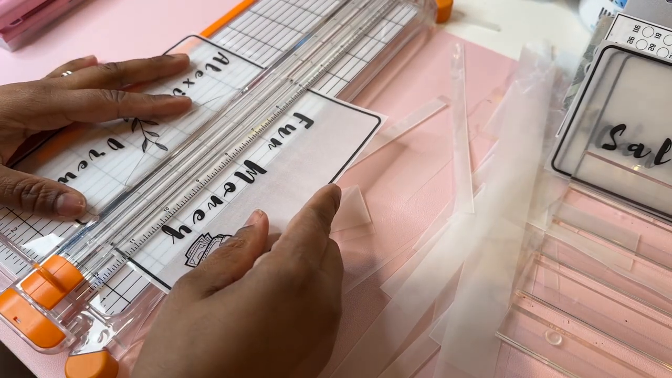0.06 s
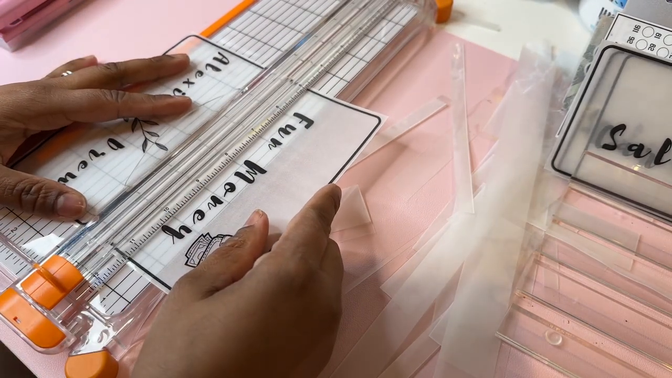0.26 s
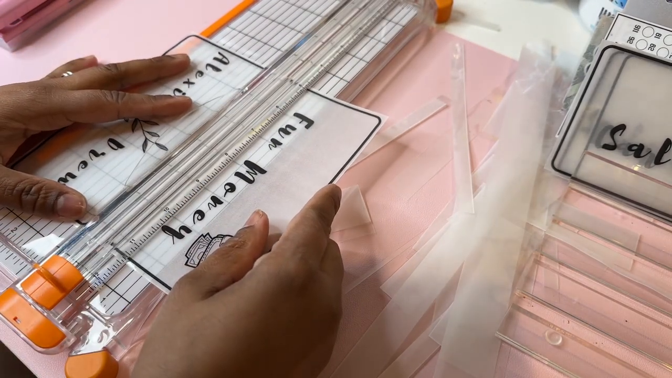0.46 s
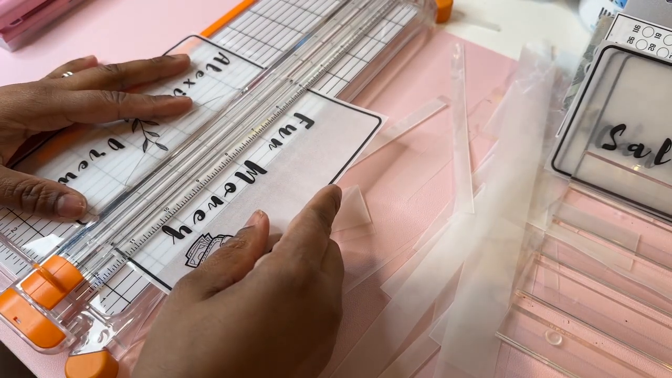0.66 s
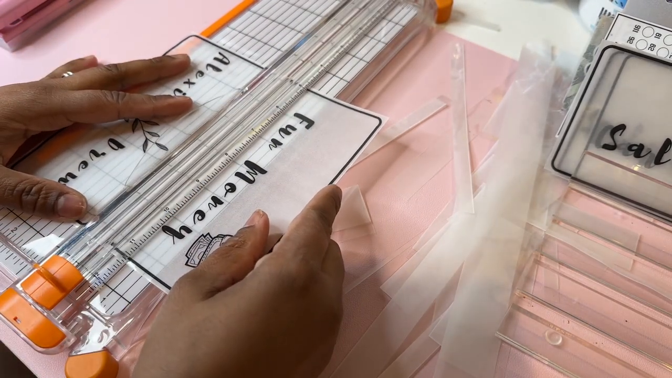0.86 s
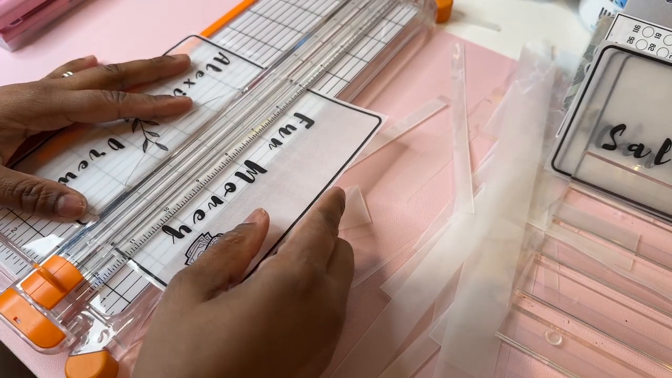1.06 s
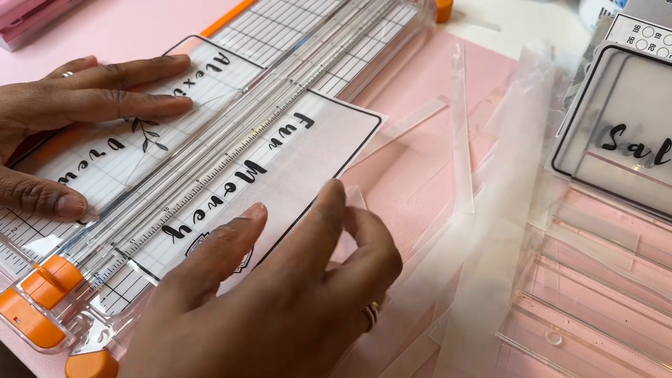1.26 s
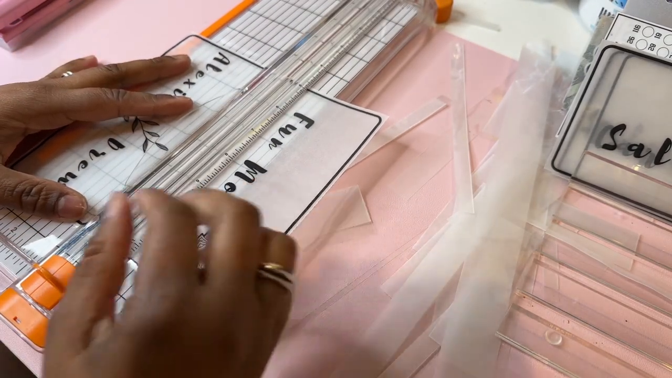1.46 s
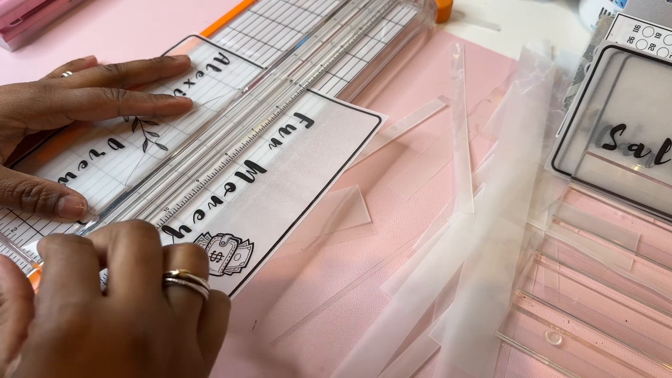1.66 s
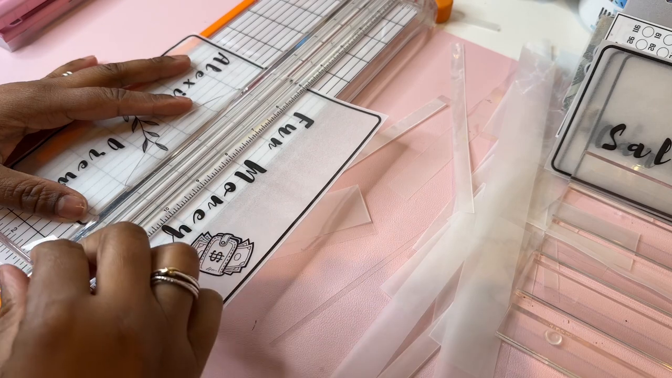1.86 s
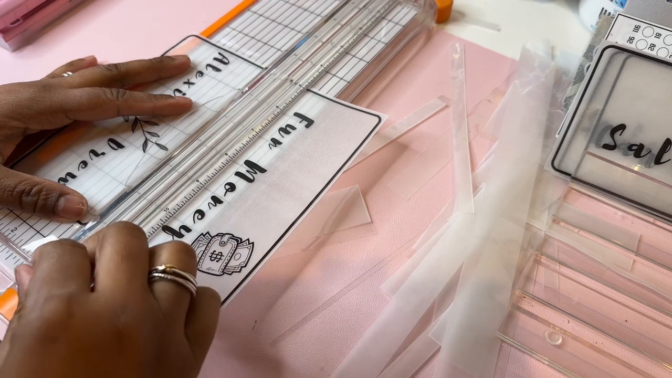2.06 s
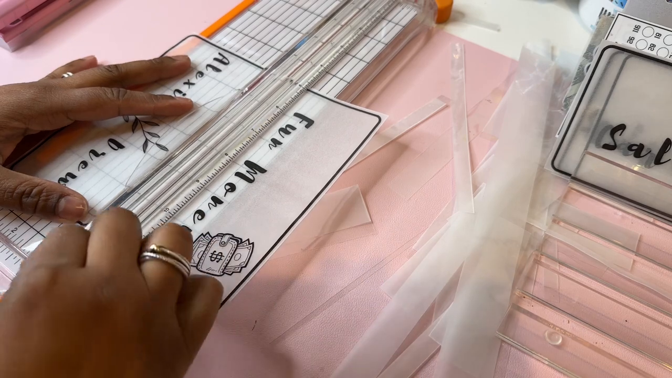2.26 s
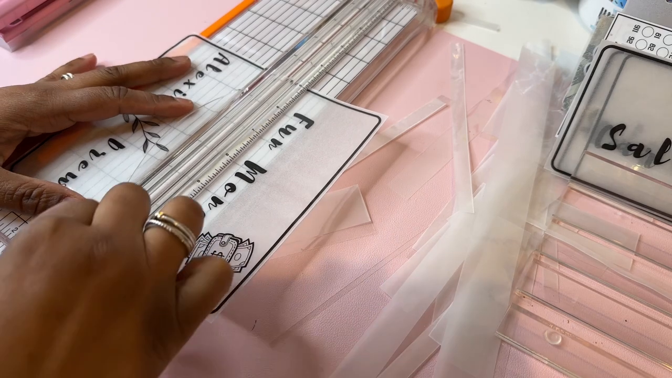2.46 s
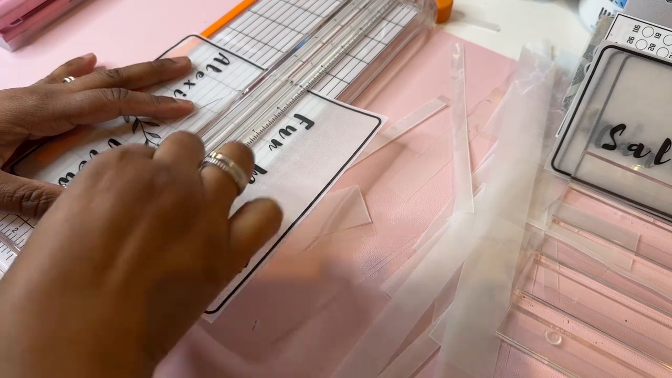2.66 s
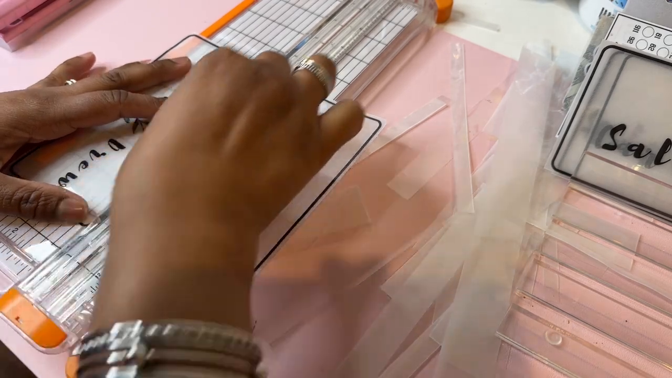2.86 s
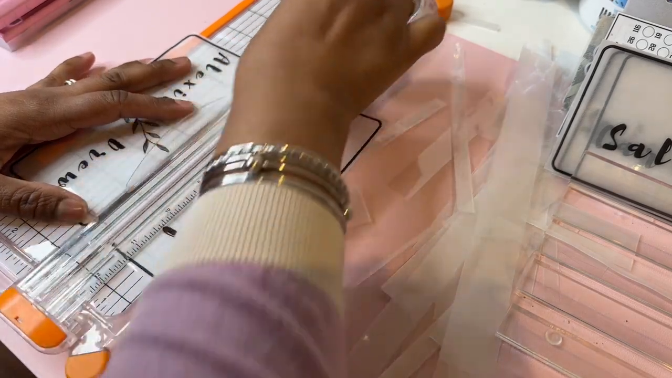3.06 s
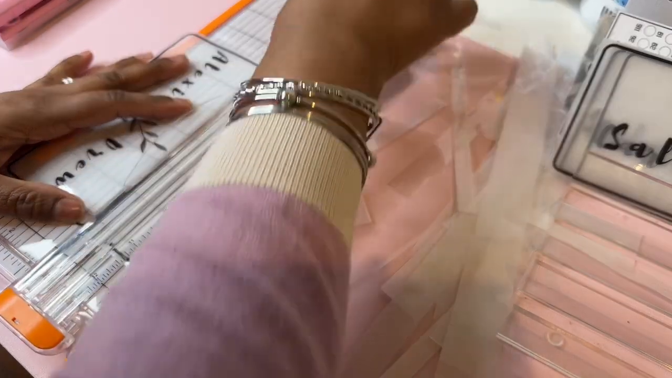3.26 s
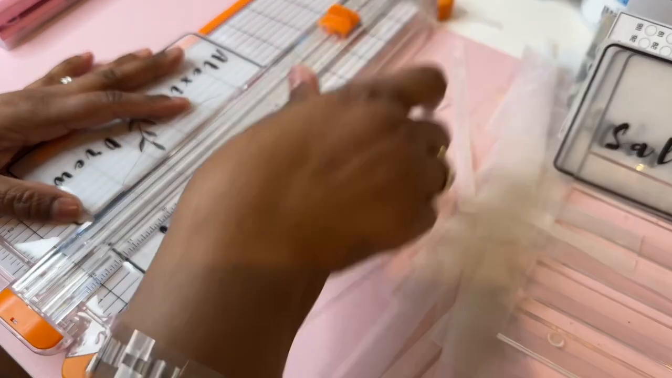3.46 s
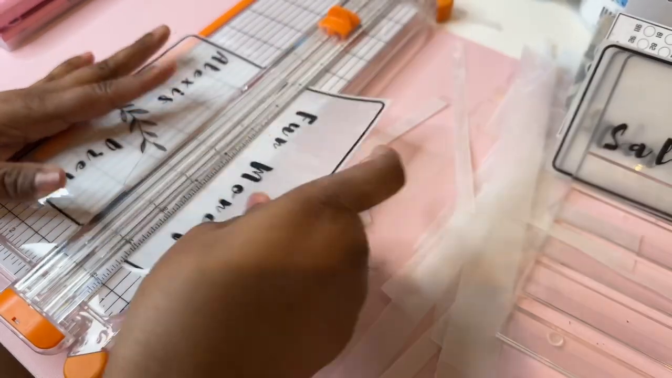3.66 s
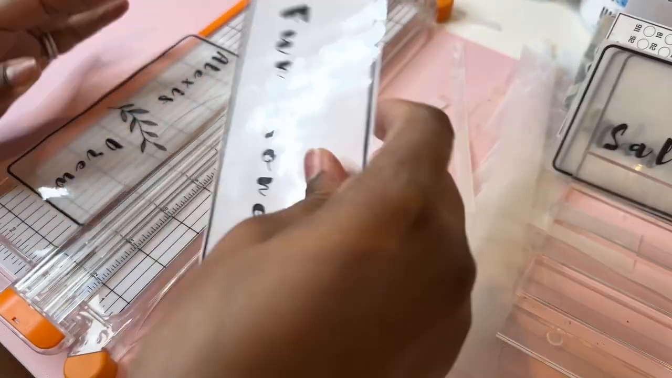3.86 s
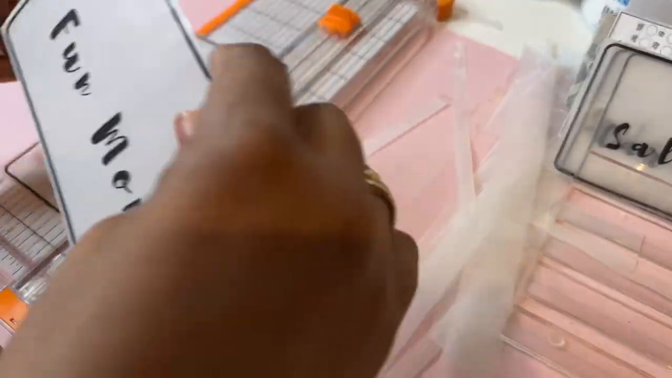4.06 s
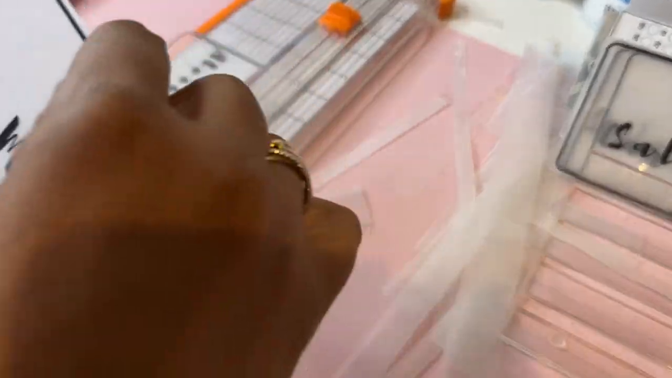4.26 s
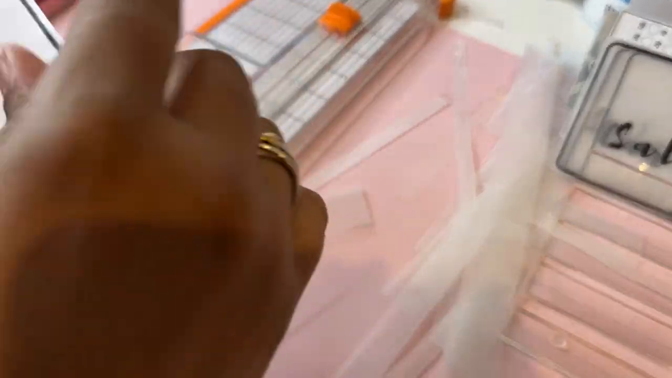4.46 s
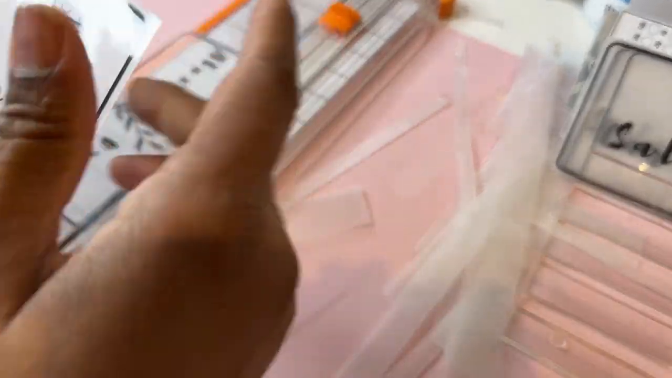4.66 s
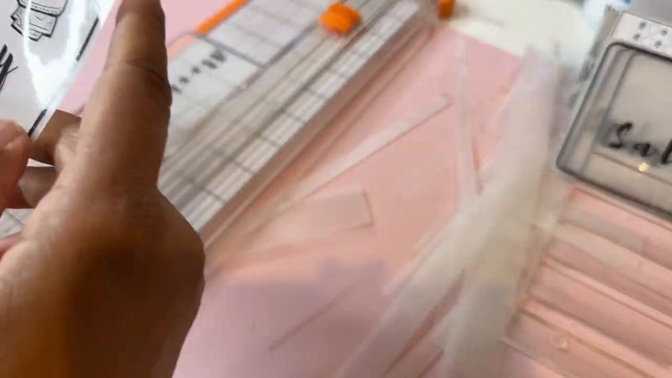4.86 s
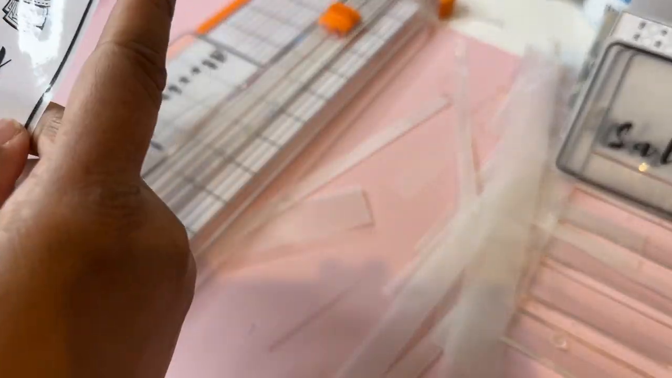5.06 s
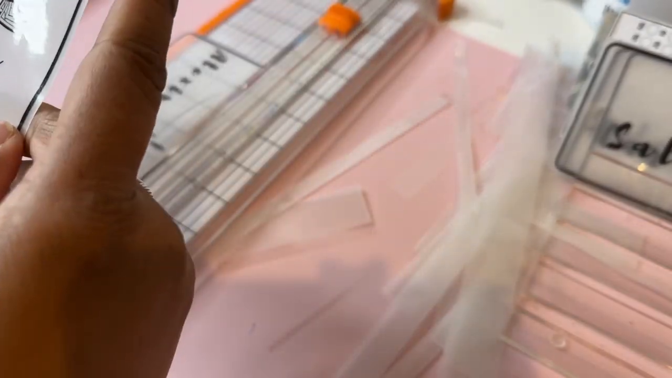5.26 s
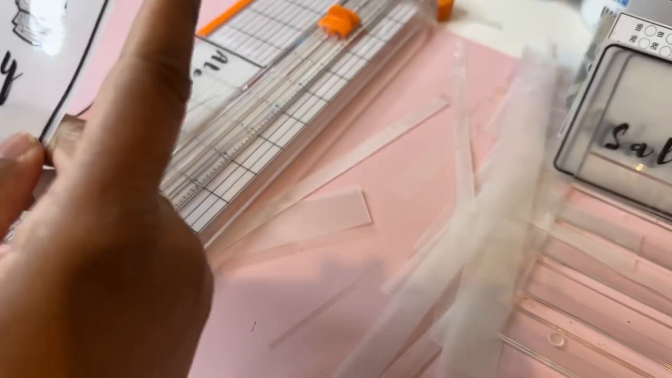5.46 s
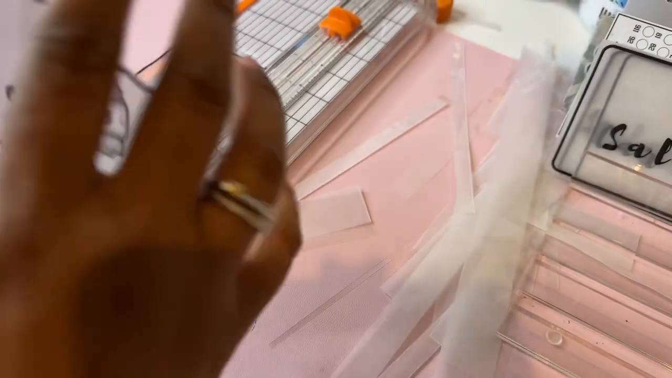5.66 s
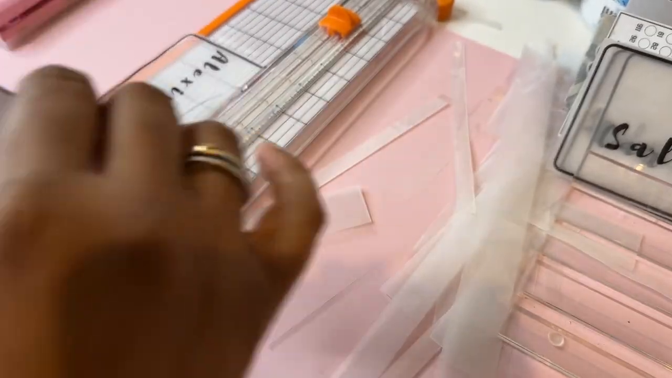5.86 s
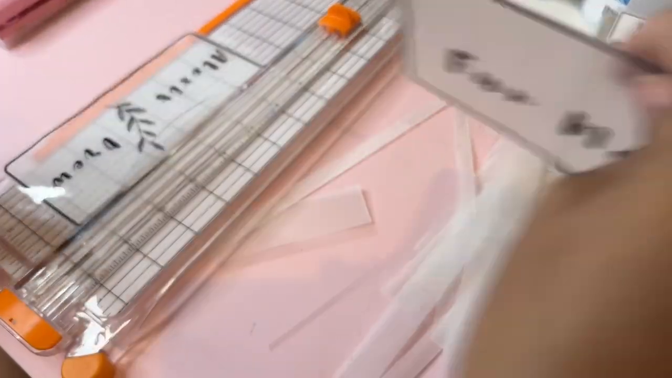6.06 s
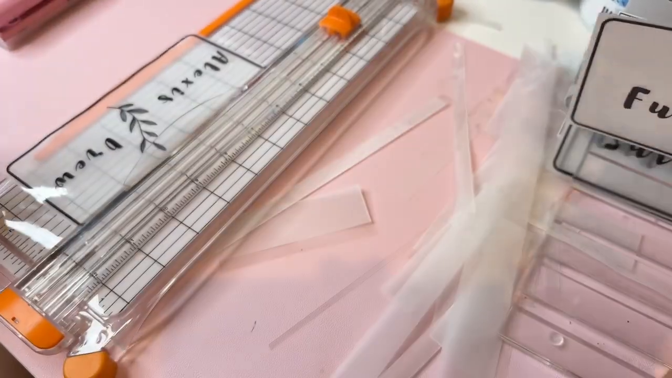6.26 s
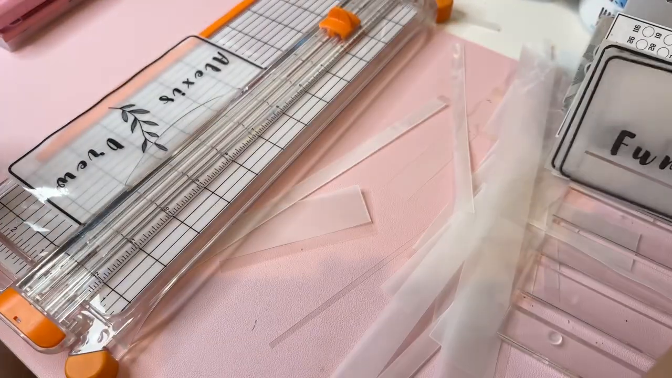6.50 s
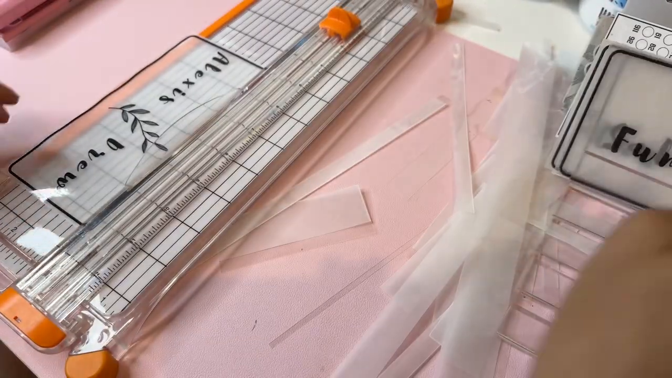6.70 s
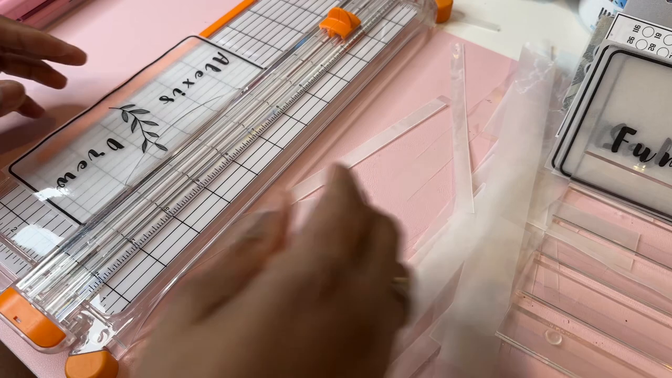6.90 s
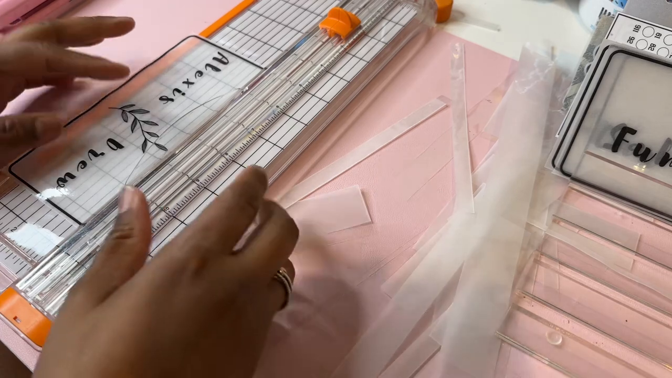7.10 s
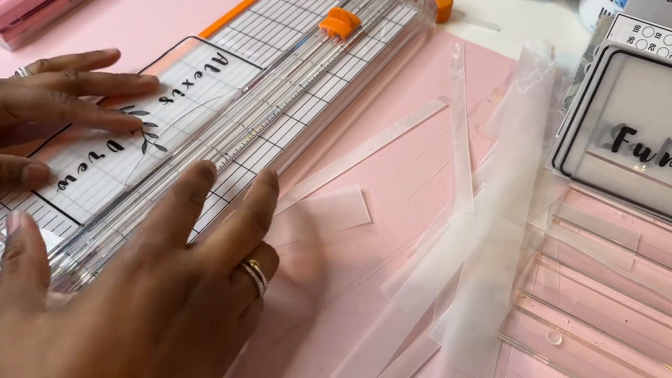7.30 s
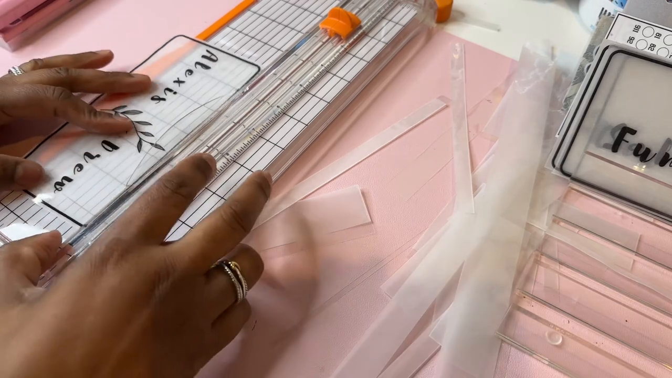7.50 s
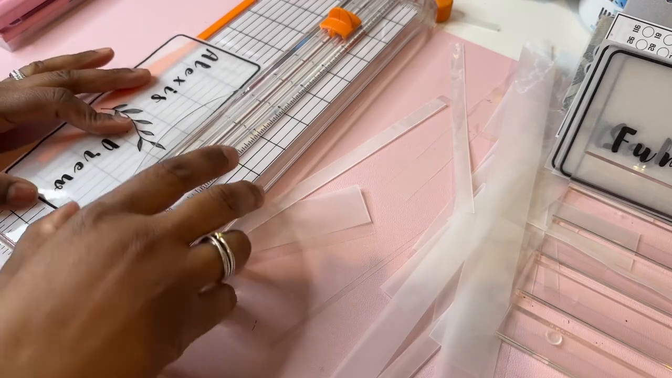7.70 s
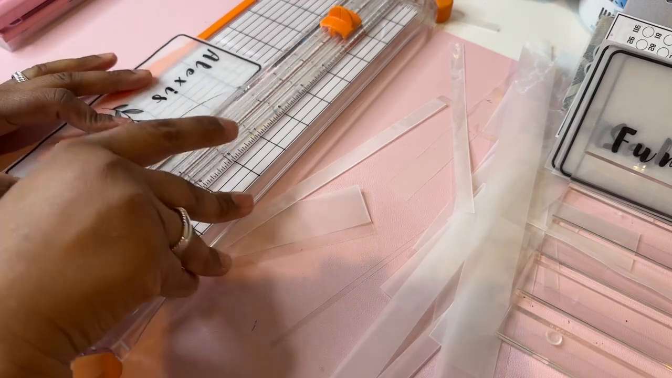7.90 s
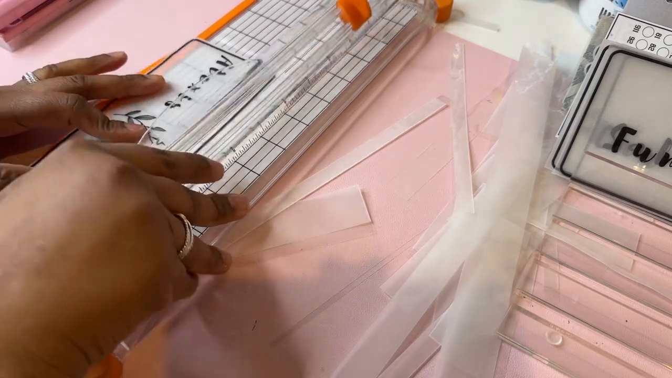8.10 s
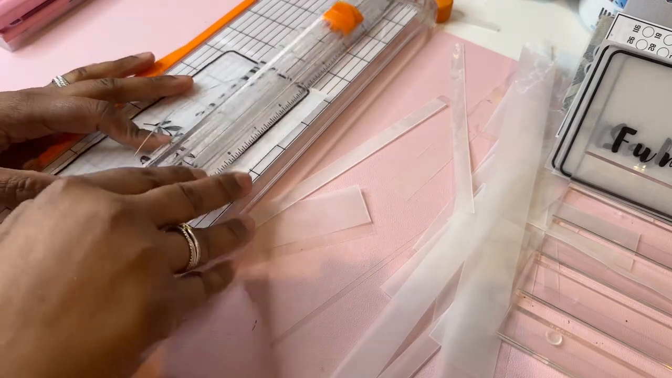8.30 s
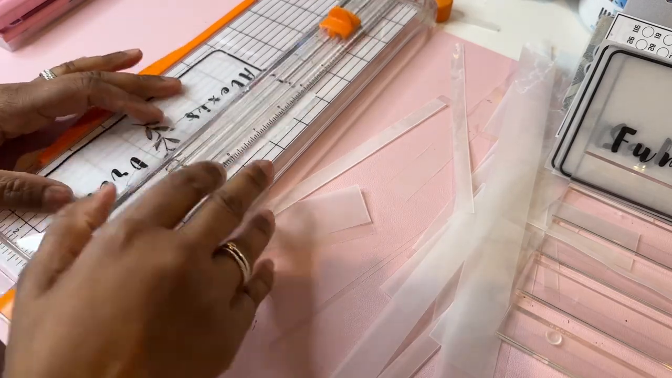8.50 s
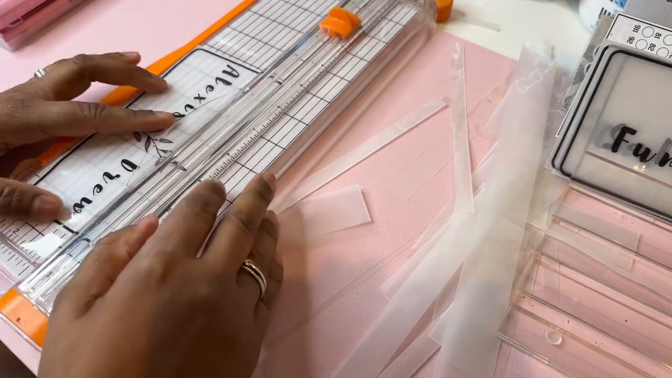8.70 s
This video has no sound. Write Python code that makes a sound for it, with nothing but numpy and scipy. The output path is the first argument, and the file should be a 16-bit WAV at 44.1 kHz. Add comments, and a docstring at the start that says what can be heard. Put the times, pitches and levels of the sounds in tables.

```python
"""Sheet trimmer on a desk

A blade tears through a stiff laminated sheet; the carriage hits its stop and bangles clink. The cut piece
is handled and dropped on a pile, the next sheet slides in and the rail snaps shut, over a low room hum.
Friction: random slips shaking dense modes. Blows: pulse, short dense ring and room tail in three bands.
Bangles: quavering high modes. Hum: wavering sines over coloured air noise."""
import sys
import numpy as np
from scipy import signal
from scipy.fft import rfft, irfft, next_fast_len
from scipy.io import wavfile

SR = 44100
rng = np.random.default_rng(int(sys.argv[2]) if len(sys.argv) > 2 else 0)


def dump(signal):
    """Clip the signal to [-1, 1] and save it as 16-bit WAV at the path in sys.argv[1]."""
    limited = np.clip(np.atleast_2d(signal).T, -1, 1)
    pcm = np.round(limited * 32767).astype(np.int16)
    wavfile.write(sys.argv[1], SR, pcm)


N = 385467

# stroke effort before zone gains [t/s, level/dB]
EFFORT = [(2.615, -57.5), (2.645, -52), (2.899, -49), (2.911, -47.5), (3.03, -46.5)]
# desk rumble, base groan, low and high carriage rattle, blade rasp:
# [low f/Hz, high f/Hz, gain/dB, extra at PRE_STROKE/dB, extra at NEAR_STOP/dB]
CUT_ZONES = [(77, 93, -11.5, -5, -1), (280, 400, -6, 9, 0.5), (605.4, 957, -1, 5, 7),
             (1120, 1750, -4.5, 1, 8), (1790, 22000, 3, -1.5, -2)]
# zone-balance swells [middle t/s, half length/s]; the first is over before the effort starts
PRE_STROKE = (2, 0.082)
NEAR_STOP = (2.995, 0.06)
# colour of the stroke [f/Hz, level/dB]
STROKE_COLOUR = [(120, -2), (220, -8), (370, -1.5), (470, 4.5), (640, -5.5), (1300, -6), (1800, -13.5),
                 (6000, -13), (10000, -22.5), (14500, -23)]
# resonances of the trimmer's base and rail, also used by knocks() [f/Hz, width/Hz, relative level/dB]
TRIMMER_MODES = [(317, 93, 2.5), (395, 9.1, 9.5), (623, 120, 7.5), (1040, 26, 0), (1340, 23, -1.5),
                 (2110, 46, 4.5), (3745, 62, 1.5), (4870, 36, 2), (8370, 96, 3)]


def cut(judder_db=-0.4, left_db=1.5):
    """Thousands of blade slips per second shake the trimmer: groan at first, more rattle near the stop."""
    slips = friction(slips_per_s=5500, size_db=2.0, smooth=1.1, ring_t60_s=0.04, shifts_per_s=40, count=8)
    shaken = resonate(coloured(slips, STROKE_COLOUR), TRIMMER_MODES, ring_db=-10.0)
    effort, = gains_in_time(EFFORT, fade_s=0.02)
    pre_stroke, near_stop = swell(*PRE_STROKE), swell(*NEAR_STOP)
    judder = from_db(judder_db * drift(170))
    zones = 0
    for low_hz, high_hz, db, pre_db, stop_db in CUT_ZONES:
        gain = from_db(db + pre_db * pre_stroke + stop_db * near_stop)
        zone = gain * rms_one(band(shaken, low_hz, high_hz))
        zones = zone - zones   # alternating signs join the zones smoothly
    return (zones * effort + groan()) * judder * panned(left_db)


# base resonance as the cut begins [t/s, f/Hz, level/dB]
GROAN = [(2.616, 660, -45), (2.655, 561.6, -45.5), (2.72, 395, -47.5), (2.79, 384, -56)]
GROAN_CHANGES_PER_S = 520   # widens the resonance


def groan():
    """Slips shake a broad base resonance that sinks as the carriage leaves the stiff end of the rail."""
    s, hz, db = np.transpose(GROAN)
    phase_rad = 2 * np.pi * np.cumsum(np.interp(np.arange(N) / SR, s, hz)) / SR
    level, = gains_in_time(np.transpose([s, db]), fade_s=0.014)
    return level * rms_one(spread(quavering(phase_rad, GROAN_CHANGES_PER_S)))


TRIMMER_LEFT_DB = 3.5   # left-right difference before band shares
# knocks on the trimmer [t/s, strength/dB, snap over clack/dB, thud over clack/dB]
KNOCKS = [(2.3645, -52, 9, 2.5), (2.610, -52, 2, 0), (3.045, -28.5, 3.5, -6.5), (3.2555, -69, 14, 9.5),
          (3.728, -45, 14, -2.5), (7.215, -60.5, 14.5, -10), (7.232, -62.5, 7, 6.5),
          (7.4856, -60.5, 7.5, 7.5), (7.996, -58, -9, 7.5), (8.1235, -68, 16, 6.5), (8.3391, -43, 2, 4.5),
          (8.3493, -43.5, 3.5, -1), (8.3715, -37.5, 10.5, -9), (8.4405, -29.5, 8, -10.5),
          (8.4522, -46, 28, 4), (8.4807, -40, 14, 1.5)]
# quick touches seating the carriage:
# [start t/s, gap/s, strength/dB, hardness/dB, weight/dB, strength step/dB, hardness step/dB]
CARRIAGE_SEATS = (2.2925, .0237, -56.5, -13, -6.5, 1, 3.5)
# snap, clack, thud: [low f/Hz, high f/Hz, gain/dB, first pulse/dB, ring t60/s, room/dB, room t60/s]
TRIMMER_PARTS = [(2188, 14000, 15, -11, 0.072, -11.5, 0.29), (477, 2260, 25.5, -3, 0.098, -10.5, 0.4),
                 (116, 442, 25, -12.5, 0.089, -4, 0.46)]
# colour of the knocks [f/Hz, level/dB]
TRIMMER_COLOUR = [(100, 0), (300, -5), (900, 4), (1600, -1), (2600, -2.5), (4500, 4.5), (7500, -1.5),
                  (11000, -9)]


def knocks():
    """Fingers, carriage and rail strike the trimmer and excite its modes."""
    rows = KNOCKS + touches(CARRIAGE_SEATS, count=3)
    hits = contacts(rows, lambda s: TRIMMER_LEFT_DB, sharp_db=1.0)
    struck = blows(hits, TRIMMER_PARTS, contact_s=0.001052, rise_s=0.00037)
    return resonate(coloured(struck, TRIMMER_COLOUR), TRIMMER_MODES, ring_db=-7.5)


# carriage on its stop, rail snapping shut [t/s, level before modes/dB]
SLAMS = [(3.0459, -21.5), (8.4417, -25.5)]
# damped bending modes of the base [f/Hz, relative level/dB, t60/s]
BASE_MODES = [(332, -3.5, 0.047), (666, -6, 0.027), (915, 3.5, 0.021), (1360, -3.5, .024)]


def slams(room_db=-11, low_hz=240):
    """The base bends under a hard blow and settles fast; its ring carries no deep bass."""
    out = np.zeros((2, N))
    t = np.arange(SR // 2) / SR
    bend = sum(from_db(db) * np.sin(2 * np.pi * hz * t) * decay(t, t60) for hz, db, t60 in BASE_MODES)
    for s, db in SLAMS:
        add(out, s, from_db(db) * band(bend, low_hz, SR / 2)[None])
    tail = convolve(out, dying_noise(0.3, rise_s=0.011))
    return out * panned(TRIMMER_LEFT_DB / 2) + from_db(room_db) * spread(tail)


# soft, hollow thumps of base or sheet [t/s, strength/dB, low f/Hz, high f/Hz]
THUMPS = [(0.982, -63, 300, 715), (2.195, -50.5, 504, 1110), (2.319, -46.5, 282, 1520),
          (2.366, -43, 570, 1420), (3.076, -58, 500, 1320), (3.137, -47.5, 746, 1750),
          (3.156, -50, 446, 1290), (3.167, -45, 298, 1470), (3.226, -45.5, 510, 1110),
          (3.637, -48, 900, 2200), (3.725, -32.5, 660, 1155), (3.734, -34.5, 796, 1610),
          (4.445, -59, 767, 1070), (4.883, -53.5, 150.4, 425), (5.789, -58, 1040, 1480),
          (5.804, -69, 260, 650), (5.905, -56, 1230, 1660), (5.946, -58.5, 1320, 1860),
          (6.114, -49.5, 258, 364), (6.118, -61, 1350, 1680), (6.417, -36, 159, 565),
          (6.448, -41.5, 391, 533), (7.363, -50, 400, 1210), (7.372, -45.5, 250, 956),
          (7.716, -50, 520, 1150), (7.744, -52.5, 457, 1100), (7.758, -46.5, 214, 885),
          (7.9853, -44.5, 323, 1385), (7.997, -41, 171, 396), (8.124, -54.5, 840, 1380)]


def thumps(gain_db=21, front_s=0.0083, front_db=-2, ring_t60_s=0.099, room_db=-5, room_t60_s=0.23, left_db=1):
    """Soft touch, one band of dense modes: falling bending-wave front, then dull ring and room."""
    fronts, rings = np.zeros((2, 2, N))
    t = np.arange(SR // 2) / SR
    for s, db, low_hz, high_hz in THUMPS:
        hz = low_hz + (high_hz - low_hz) * np.exp(-2 * t / front_s)
        envelope = np.sin(np.pi * np.minimum(t / front_s, 1)) ** .5
        front = envelope * np.sin(2 * np.pi * np.cumsum(hz) / SR)
        room = from_db(room_db) * dying_noise(room_t60_s, rise_s=0.013)
        modes = dying_noise(ring_t60_s, rise_s=0.0039) + room
        band_sos = signal.butter(3, [low_hz, high_hz], "band", fs=SR, output="sos")
        ring = signal.sosfilt(band_sos, modes)
        add(fronts, s, from_db(db + front_db) * front[None] / np.linalg.norm(front))
        add(rings, s, from_db(db) * ring / np.linalg.norm(ring, axis=1, keepdims=True))
    energy_norm = np.hypot(1, from_db(front_db))
    return from_db(gain_db) * (fronts + spread(rings)) / energy_norm * panned(left_db)


# sheet flicks, buckles, clatters onto the pile [t/s, strength/dB, snap over clack/dB, thud over clack/dB]
FLICKS = [(3.528, -56, -1, -4), (3.611, -58.5, 6, 4), (3.6325, -51, -24, -15), (3.655, -45, 4.5, -12),
          (3.861, -58.5, -5.5, -7), (4.388, -56, 3.5, 7.5), (4.437, -65, -2, 1), (4.826, -66, 1.5, 3.5),
          (4.876, -73.5, -11, 8.5), (5.787, -60.5, 2, 8.5), (5.814, -62, -3, 4), (5.823, -69.5, 10, 1),
          (5.902, -61, 6, 1.5), (5.943, -67.5, 4.5, 8), (6.115, -64.5, 0, 4), (6.393, -49, 6, 6),
          (6.406, -44, 3, 3), (6.417, -50, 5, -5), (6.432, -51.5, 5, -5), (6.460, -58, 8.5, 3),
          (6.498, -60, 3, 9.5)]
# sheet position, lifted on the left and dropped on the right [t/s, left-right level/dB]
SHEET_PLACE = [(3.6, 3), (4.4, 11.5), (5.9, 6.5), (6.4, -1)]
# snap, clack, thud: [low f/Hz, high f/Hz, gain/dB, first pulse/dB, ring t60/s, room/dB, room t60/s]
SHEET_PARTS = [(2190, 7200, 23, 17, 0.0085, -5, 0.22), (540, 3620, 23.6, -15, 0.035, -5.5, 0.19),
               (101, 440, 20.4, -6, 0.11, -9.5, 0.27)]
# colour of the flicks [f/Hz, level/dB]
SHEET_COLOUR = [(100, 17), (300, 1.5), (1000, 8.5), (2500, -5.5), (4200, 0), (7500, -4.5), (10000, 0.5),
                (15000, 11)]
# resonances of the stiff sheet [f/Hz, width/Hz, relative level/dB]
SHEET_MODES = [(274.9, 80, 1), (452, 400, -15), (970, 77, -14), (1620, 29, -3), (2370, 400, -7),
               (4200, 81, -13)]


def flicks(level_db=-5, ring_db=3):
    """The sheet snaps, taps and clatters; bending waves smear each contact over 4 ms, treble first."""
    hits = contacts(FLICKS, lambda s: np.interp(s, *np.transpose(SHEET_PLACE)), sharp_db=1.0)
    taps = coloured(blows(hits, SHEET_PARTS, contact_s=0.0024, rise_s=0.00085), SHEET_COLOUR)
    t = np.arange(SR // 250) / SR
    smear = np.sin(np.pi * SR / 2 * t * (2 - t / t[-1]))   # chirp from SR/2 down to 0
    bent = convolve(taps, smear[None] / np.linalg.norm(smear))
    return from_db(level_db) * resonate(bent, SHEET_MODES, ring_db)


# bangle contacts; a free hoop rings on, crowded ones mostly tick [t/s, tick/dB, ring/dB], both relative
CLINKS = [(3.317, -50, -41), (3.352, -55, -41), (3.4177, -39.5, -41), (3.4417, -39.5, -45.5),
          (3.4524, -36.5, -40), (3.484, -41, -48.5), (3.501, -39, -51.5), (3.5074, -38.5, -54)]
# bangle modes [f/Hz, relative level/dB, t60/s]
BANGLE_MODES = [(7000, -8.5, 0.22), (10400, 0.5, 0.19), (14200, 3, 0.21)]


def bangles(ring_db=-15, tick_db=7, tick_t60_s=0.065, room_db=4, room_t60_s=0.13, jostles_per_s=160):
    """Thin metal hoops tick and ring very high; jostling breaks up each ring."""
    rings, clicks = np.zeros((2, 2, N))
    t = np.arange(SR // 2) / SR
    for s, click_db, _ in CLINKS:
        add(clicks, s, from_db(click_db + tick_db) * dying_noise(tick_t60_s, rise_s=1 / SR))
        add(clicks, s, from_db(click_db + room_db) * dying_noise(room_t60_s, rise_s=0.014))
    for hz, mode_db, t60_s in BANGLE_MODES:
        power = np.zeros((1, N))   # overlapping rings add in power
        for s, _, db in CLINKS:
            add(power, s, (from_db(db + ring_db + mode_db) * decay(t[None], t60_s)) ** 2)
        rings += np.sqrt(power) * quavering(2 * np.pi * hz * np.arange(N) / SR, jostles_per_s)
    click_colour = [(300, -27), (1500, -4.5), (4000, 1.0), (9000, 9.5), (14000, 17.0)]   # f/Hz, level/dB
    return spread(rings + coloured(clicks, click_colour))


# fingernail and sheet-corner ticks [t/s, strength/dB, ring f/Hz]
TICKS = [(0.172, -61, 3640), (0.5603, -67, 5570), (5.947, -49, 4300), (6.119, -63.5, 4100),
         (6.135, -55.5, 4170), (7.203, -49, 4400), (7.234, -45, 4320), (7.283, -50, 4500),
         (7.362, -58, 4900), (7.380, -54, 4700), (7.3935, -51, 3670), (7.756, -46.5, 5400),
         (7.999, -51, 3880)]


def ticks(width_hz=300, ring_db=17, gain_db=9, room_db=-10):
    """A tiny sharp contact rings one short resonance of the plastic under it."""
    out = np.zeros((2, N))
    for s, db, hz in TICKS:
        click = dying_noise(.014, rise_s=1 / SR) + from_db(room_db) * dying_noise(.2, rise_s=.01)
        rung = resonate(band(click, hz / 2, 2 * hz), [(hz, width_hz, 0)], ring_db)
        add(out, s, from_db(db + gain_db) * rung)
    return spread(out)


# short pushes of sheets and fingers [middle t/s, relative peak/dB, half length/s, edge brightness/dB]
PUSHES = [(1.186, -72.5, 0.036, 10.5), (1.26, -56.5, 0.036, 2.5), (1.271, -55, 0.013, 3),
          (1.434, -73.5, 0.043, 5), (2.573, -67, 0.1, 2), (3.222, -62.5, 0.076, 5),
          (3.68, -52.5, 0.054, 7.5), (3.928, -68, 0.036, 4), (5.907, -59, 0.021, -7),
          (6.12, -63.5, 0.039, -14), (6.404, -37, 0.015, -12), (7.099, -70, 0.05, -10.5),
          (7.439, -51, 0.0092, 7.5), (7.47, -52.5, 0.077, -3.5), (7.701, -55.5, 0.061, -3.5),
          (7.871, -60, 0.051, -21), (8.184, -55, 0.13, -3.5), (8.339, -39, 0.0091, -10),
          (8.441, -27.5, 0.009, 2), (8.703, -60, 0.079, 4)]
# colour of the smooth hiss [f/Hz, level/dB]
SLIDE_COLOUR = [(500, -5), (2600, -12.5), (3550, 2.5), (4400, -4.5), (6500, -14), (15000, -21.5)]
# sizzle of a dragging edge [f/Hz, level/dB]
EDGE_COLOUR = [(2500, -25), (4000, -6), (4900, 4), (7000, -3.5), (9500, -7.5), (14000, -12)]


def sliding(level_db=-12.0, left_db=2):
    """Smooth plastic hisses over the bed in swelling pushes; a dragging edge adds a brighter sizzle."""
    speed = sum(from_db(db) * swell(s, half_s) for s, db, half_s, _ in PUSHES)
    drag = sum(from_db(db + bright_db) * swell(s, half_s) for s, db, half_s, bright_db in PUSHES)
    slips = friction(slips_per_s=1400, size_db=4.0, smooth=0.38, ring_t60_s=0.073, shifts_per_s=21)
    edge = friction(slips_per_s=3700, size_db=5.5, smooth=0.7, ring_t60_s=0.078, shifts_per_s=21, count=1)
    hiss = speed * rms_one(coloured(slips, SLIDE_COLOUR))
    sizzle = drag * rms_one(coloured(edge, EDGE_COLOUR))
    return (hiss + sizzle) * from_db(level_db) * panned(left_db)


# hands and sleeves on the desk [middle t/s, brush/dB, rumble/dB, half length/s]
HANDS = [(1.545, -76.5, -87, 0.25), (2.885, -64.5, -64, 0.47), (3.89, -77.5, -64, 0.23),
         (4.498, -91, -67.5, 0.42), (6.092, -77.5, -63.5, 0.12), (7.902, -81.5, -74.5, 1)]
# colour of skin and cloth [f/Hz, level/dB]
BRUSH_COLOUR = [(150, -12), (300, 0), (1000, -3), (3000, -14.5), (7000, -30)]
# colour of the loaded desk [f/Hz, level/dB]
RUMBLE_COLOUR = [(50, -29), (100, -4.5), (128, 14.5), (160, -7.5), (500, -42.5)]


def hands():
    """Skin and cloth brush softly; the desk rumbles under the weight of the arms."""
    brush = sum(from_db(db) * swell(s, half_s) for s, db, _, half_s in HANDS)
    rumble = sum(from_db(db) * swell(s, half_s) for s, _, db, half_s in HANDS)
    brushing = brush * rms_one(coloured(noise(), BRUSH_COLOUR))
    return brushing + rumble * rms_one(coloured(noise(), RUMBLE_COLOUR))


# hum partials [f/Hz, relative level/dB]
HUM = [(59.2, 1.5), (86.1, -9), (118.5, -14.5), (177.6, -7.5)]
# hum gain over time [t/s, level/dB]
HUM_LEVEL = [(0.0, -72.5), (2.98, -65.5), (5.62, -71), (8.7, -68)]
# thin faint whine [f/Hz, peak/dB, middle t/s, half length/s]
WHINE = (2400, -92.5, 2.5, 1.7)
# colour of the air noise [f/Hz, level/dB]
AIR = [(24, -41), (43, -5), (70, -4.5), (110, -11.5), (190, -13.5), (450, -25.5), (1100, -29.5),
       (2500, -36.5), (6000, -41.5), (16000, -56.5)]
AIR_DB = -71


def room_tone(waver_db=3.0, wander_rad=0.04):
    """A wavering machine hum and a thin whine, as sines, over faint air noise."""
    t = np.arange(N) / SR
    hum = 0
    for hz, db in HUM:
        gain = np.sqrt(2) * from_db(db + waver_db * drift(8.2))
        hum = hum + gain * np.sin(2 * np.pi * hz * t + wander_rad * drift(2.1))
    whine_hz, whine_db, middle_s, half_s = WHINE
    whine = from_db(whine_db) * swell(middle_s, half_s) * np.sin(2 * np.pi * whine_hz * t + drift(25))
    hum_gain, = gains_in_time(HUM_LEVEL, fade_s=1)
    return hum_gain * hum + whine + from_db(AIR_DB) * rms_one(coloured(noise(), AIR))


def friction(slips_per_s, size_db, smooth, ring_t60_s, shifts_per_s, count=4):
    """Tiny slips plus smooth hiss shake dense modes that change as the contact moves on; rms 1."""
    sizes = from_db(size_db * np.minimum(rng.exponential(1, N), 4))
    slips = rms_one((rng.random(N) < slips_per_s / SR) * sizes * rng.standard_normal((2, N)))
    force = slips + smooth * rng.standard_normal((2, N))
    shares = np.array([drift(shifts_per_s) for _ in range(count)])
    shares /= np.linalg.norm(shares, axis=0)
    rung = 0
    for share in shares:
        rung = rung + share * convolve(force, dying_noise(ring_t60_s, rise_s=0.00033)[:1])
    return rms_one(spread(rung))


def touches(run, count, jitter=0.042):
    """A run of almost evenly spaced touches whose strength and hardness change in steps."""
    start_s, gap_s, db, hard_db, weight_db, step_db, hard_step_db = run
    rows = []
    for k in range(count):
        s = start_s + gap_s * (k + jitter * rng.standard_normal())
        rows.append((s, db + k * step_db, hard_db + k * hard_step_db, weight_db))
    return rows


FIRM_DB = -19       # snap of a firm blow
SHARPENING = 0.78   # dB of contact sharpness per dB of snap


def contacts(rows, left_db_at, sharp_db):
    """Snap, clack, thud and direction per touch; a stronger, harder touch has a sharper contact."""
    hits = []
    for s, db, hard_db, weight_db in rows:
        snap_db = db + hard_db
        sharpness_db = sharp_db + SHARPENING * (snap_db - FIRM_DB)
        hits.append((s, snap_db, db, db + weight_db, left_db_at(s), sharpness_db))
    return hits


# left-right difference kept by [snap, clack, thud], as factors on dB
DIRECTION_SHARES = (1.1, 0.81, 0.24)


def blows(events, parts, contact_s, rise_s):
    """Each blow is a pulse, a short dense ring and a room tail, in treble, middle and bass."""
    out = 0
    for k, (low_hz, high_hz, gain_db, pulse_db, ring_t60_s, room_db, room_t60_s) in enumerate(parts):
        pulses, rings = np.zeros((2, 2, N))
        place = np.ones((2, N))
        for s, *levels_db, left_db, sharp_db in events:
            gain, pulse = from_db(levels_db[k] + gain_db), from_db(pulse_db + sharp_db)
            direct = gain / np.hypot(1, pulse)   # sharp contact: more energy in the pulse
            rise = rise_s / from_db(sharp_db)    # soft contact: slow build-up
            add(pulses, s + contact_s, direct * pulse * np.ones((2, 1)))
            ring = direct * dying_noise(ring_t60_s, rise)
            room = gain * from_db(room_db) * dying_noise(room_t60_s, rise_s=0.0091)
            add(rings, s, ring + room)
            i = round(s * SR)
            place[:, i:i + SR // 20] = panned(left_db * DIRECTION_SHARES[k])   # late tail stays unpanned
        part = band(place * (pulses + spread(rings)), low_hz, high_hz) * np.sqrt(SR / 2 / (high_hz - low_hz))
        out = part - out   # alternating signs join the parts smoothly
    return out


def resonate(x, modes, ring_db):
    """A body adds its two-pole resonances to whatever shakes it."""
    out = x
    for hz, width_hz, db in modes:
        r = np.exp(-np.pi * width_hz / SR)
        poles = [1, -2 * r * np.cos(2 * np.pi * hz / SR), r * r]
        rung = signal.lfilter([1, 0, -1], poles, x + 1e-18) * (1 - r * r) / 2
        out = out + from_db(db + ring_db) * rung
    return out


def quavering(phase_rad, changes_per_s):
    """A resonance whose strength and phase keep changing, as two unrelated signals."""
    cosine, sine = np.cos(phase_rad), np.sin(phase_rad)
    return np.array([drift(changes_per_s) * cosine + drift(changes_per_s) * sine for _ in range(2)])


def dying_noise(t60_s, rise_s):
    """Countless close modes swell and die together; energy 1 a channel."""
    t = np.arange(SR // 2) / SR
    tail = rng.standard_normal((2, len(t))) * decay(t, t60_s) * (1 - np.exp(-t / rise_s))
    return tail / np.sqrt(np.sum(tail ** 2, axis=1, keepdims=True))


def decay(t, t60_s):
    """Exponential decay of 60 dB in t60_s."""
    return np.exp(-np.log(1000) * t / t60_s)


def swell(middle_s, half_s):
    """Gaussian rise and fall with top 1, down to 1/e at half_s from the middle."""
    return np.exp(-((np.arange(N) / SR - middle_s) / half_s) ** 2)


def drift(knots_per_s):
    """Straight lines between unit-normal random knots."""
    knots = rng.standard_normal(N // 20)
    return np.interp(np.arange(N) / SR * knots_per_s, np.arange(len(knots)), knots)


def gains_in_time(rows, fade_s):
    """Level curves in dB as gains, fading to silence outside their span."""
    s, *columns_db = np.transpose(rows)
    t = np.arange(N) / SR
    outside_s = np.maximum(s[0] - t, t - s[-1]).clip(0)
    gate = np.clip(1 - outside_s / fade_s, 0, 1)
    return [gate * from_db(np.interp(t, s, db)) for db in columns_db]


def noise():
    """White noise as a sound field."""
    return spread(rng.standard_normal((2, N)))


# likeness of the two channels [f/Hz, left-right correlation]
LIKENESS = [(100, 0.72), (300, 0.41), (700, -0.13), (2000, -0.17), (9000, 0.08), (14000, 0.75)]


def spread(pair):
    """Two unrelated signals become a sound field with the LIKENESS correlation at each frequency."""
    size = next_fast_len(N, True)
    mid, side = rfft(pair, size)
    alike = np.clip(at_hz(LIKENESS, np.arange(len(mid)) * SR / size), -1, 1)
    field = np.sqrt((1 + alike) / 2) * mid + np.sqrt((1 - alike) / 2) * side * [[1], [-1]]
    return irfft(field, size)[:, :N]


def coloured(x, spectrum):
    """Minimum-phase filter: nothing sounds before its cause."""
    size = 8192
    gain = from_db(at_hz(spectrum, np.arange(size // 2 + 1) * SR / size))
    cepstrum = irfft(np.log(gain))
    cepstrum[1:size // 2] *= 2   # fold to causal
    cepstrum[size // 2 + 1:] = 0
    return convolve(x, irfft(np.exp(rfft(cepstrum)))[None])


def band(x, low_hz, high_hz):
    """Causal band-pass."""
    edges_hz = [low_hz, min(high_hz, .45 * SR)]
    return signal.sosfilt(signal.butter(2, edges_hz, "band", fs=SR, output="sos"), x + 1e-18)


def at_hz(points, hz):
    """Read a spectrum on a log-frequency axis."""
    f_hz, value = np.transpose(points)
    return np.interp(np.log(hz + 1), np.log(f_hz), value)


def convolve(x, response):
    """Pass each channel through an impulse response, cut to N samples."""
    return signal.oaconvolve(x, response, axes=1)[:, :N]


def add(track, s, sound):
    """Mix a sound in at a time in seconds."""
    i = round(s * SR)
    track[:, i:i + sound.shape[1]] += sound[:, :N - i]


def panned(left_db):
    """Gains of the two channels, left_db apart."""
    return from_db([[left_db / 2], [-left_db / 2]])


def rms_one(x):
    """Scale to rms 1."""
    return x / np.sqrt(np.mean(x ** 2) + 1e-20)


def from_db(db):
    """Decibels to gain."""
    return 10 ** (np.asarray(db) / 20)


def scene():
    """Everything on the desk, and the room."""
    trimmer = cut() + knocks() + slams() + thumps()
    handling = flicks() + bangles() + ticks() + sliding() + hands()
    return trimmer + handling + room_tone()


CUTOFF_HZ = 15900


def record(dry, notch_hz=11500, notch_db=-22, side_top_db=-2):
    """Mid channel dips around 11.5 kHz, side stays; the top is cut above CUTOFF_HZ."""
    mid_dip = [(notch_hz - 1300, 0), (notch_hz - 600, notch_db), (notch_hz + 600, notch_db), (notch_hz + 1300, 0)]
    mid = coloured(dry.mean(axis=0, keepdims=True), mid_dip)
    side = coloured((dry[:1] - dry[1:]) / 2, [(7000, -0.2), (10000, 2.3), (13000, side_top_db)])
    low_pass = signal.ellip(10, .2, 70, CUTOFF_HZ, fs=SR, output="sos")
    return signal.sosfilt(low_pass, mid + side * [[1], [-1]])


dry = scene()
out = record(dry)
dump(out)
```